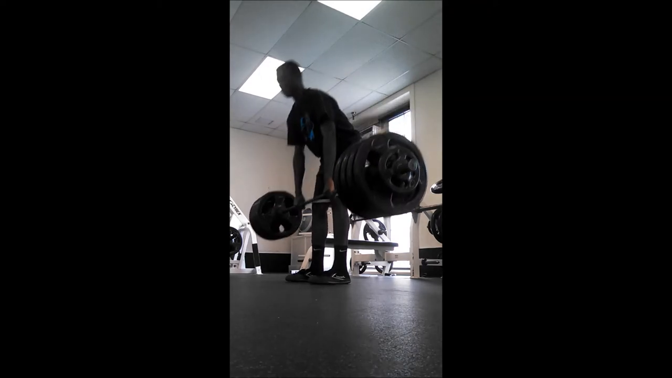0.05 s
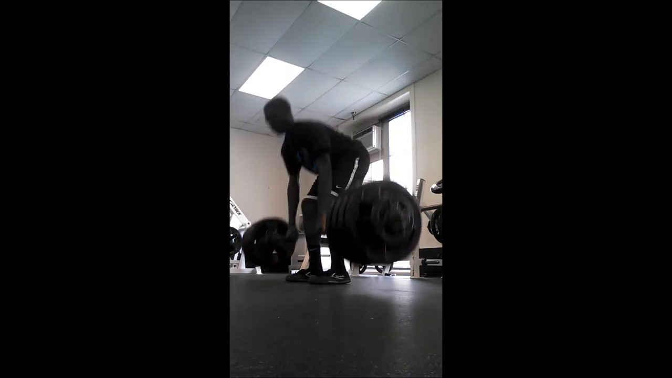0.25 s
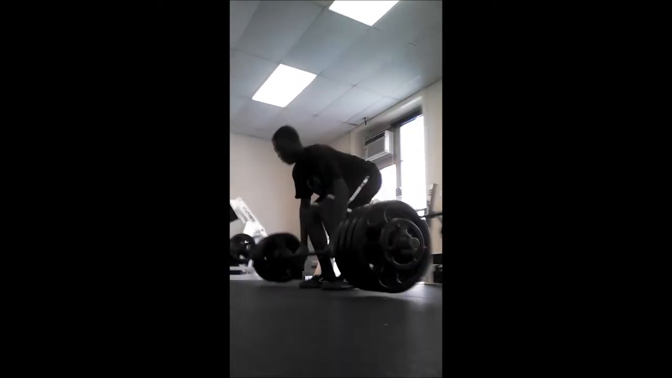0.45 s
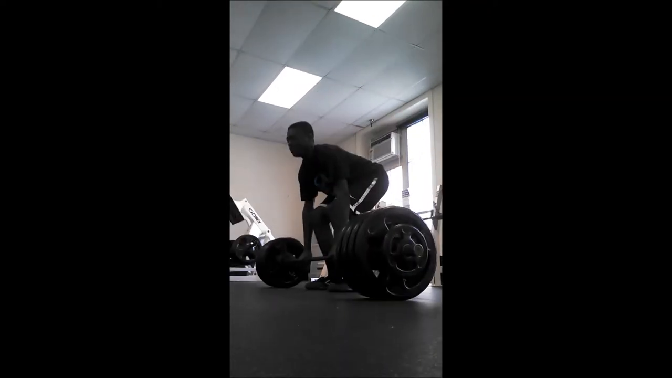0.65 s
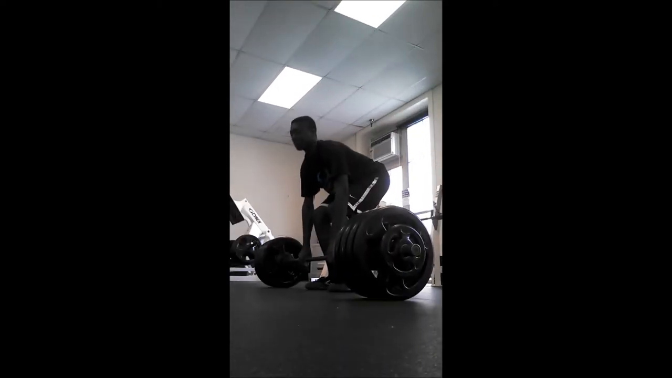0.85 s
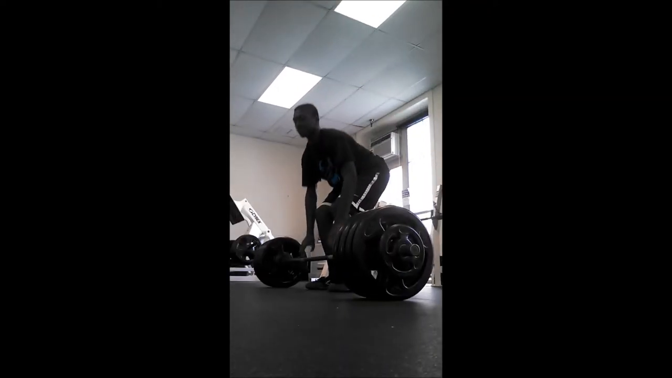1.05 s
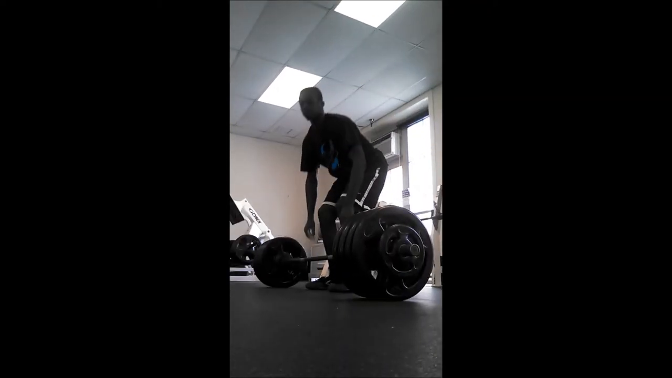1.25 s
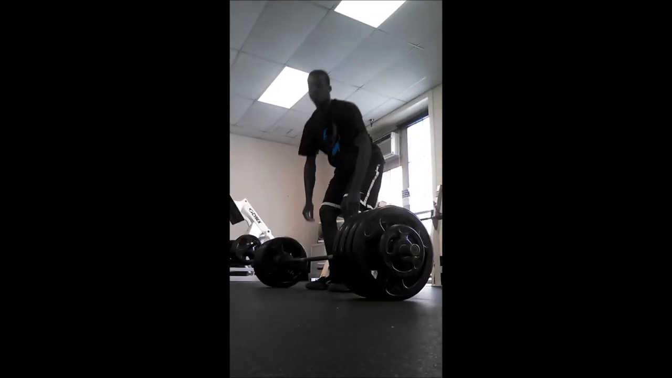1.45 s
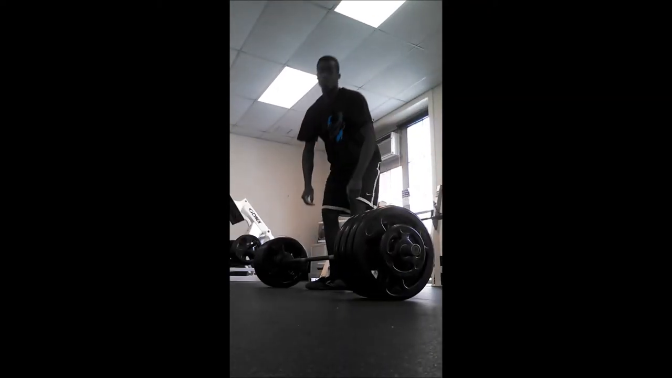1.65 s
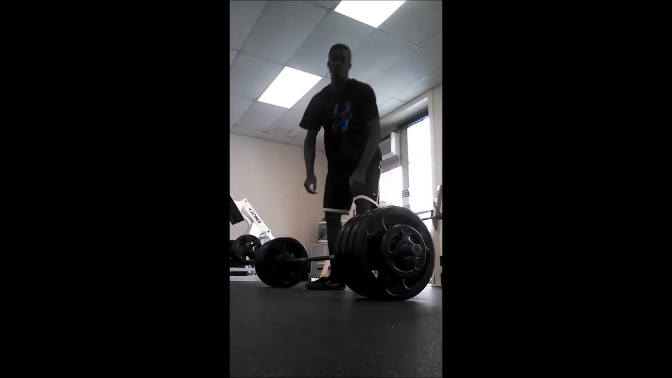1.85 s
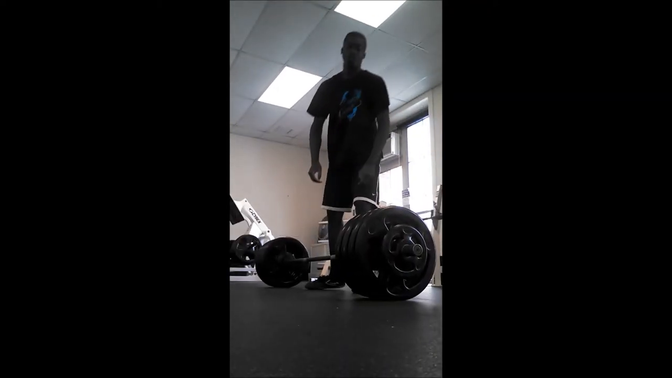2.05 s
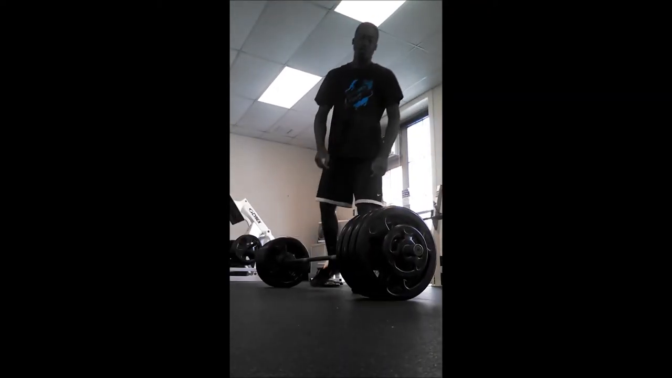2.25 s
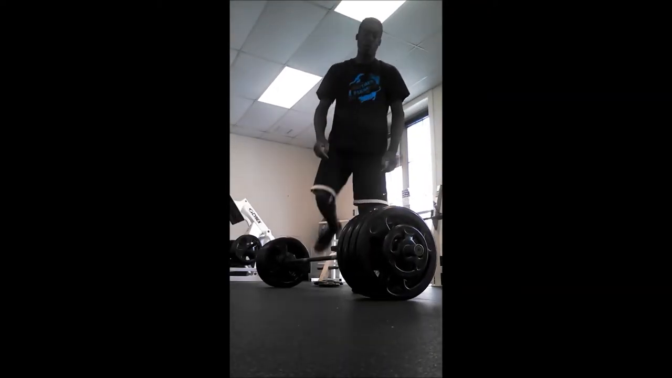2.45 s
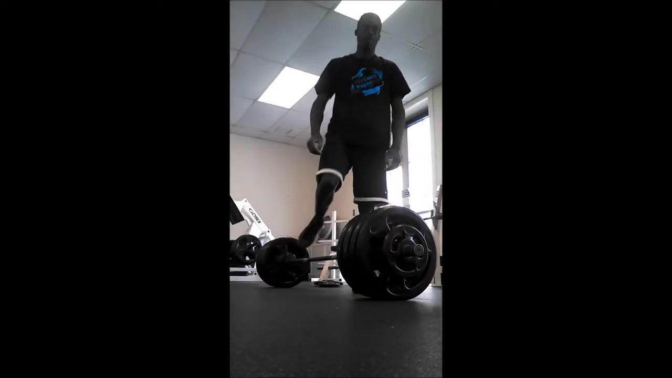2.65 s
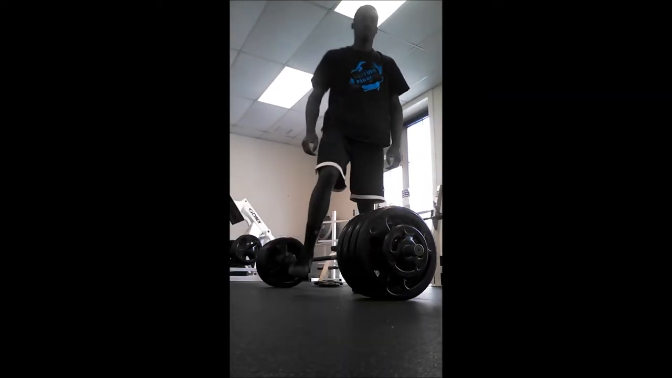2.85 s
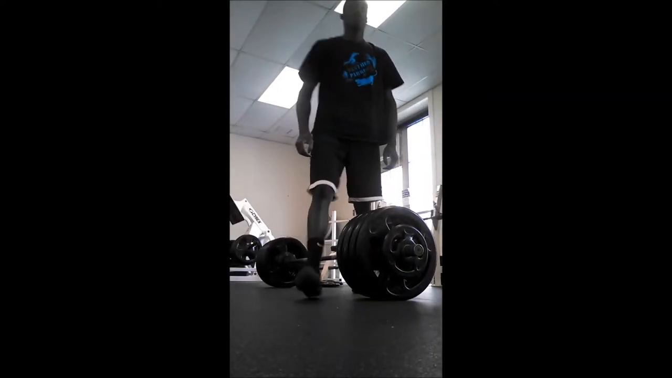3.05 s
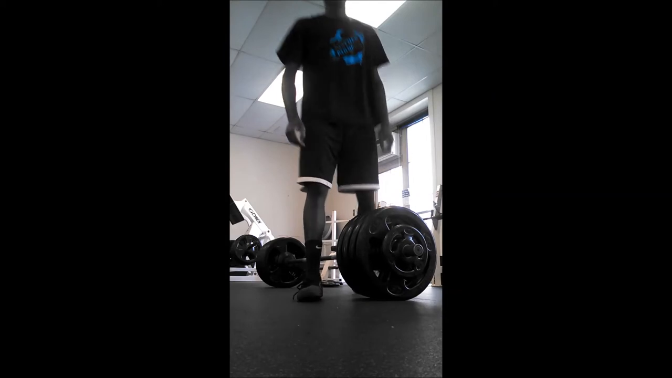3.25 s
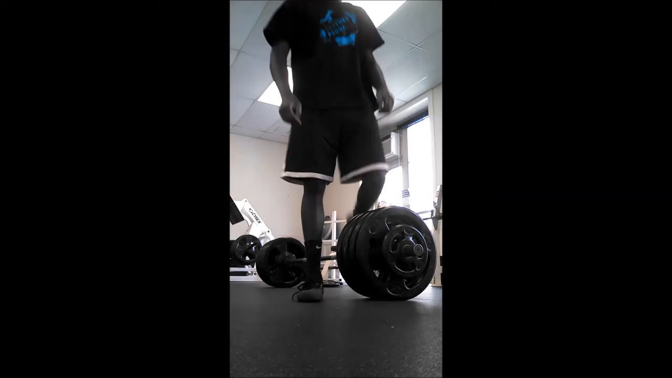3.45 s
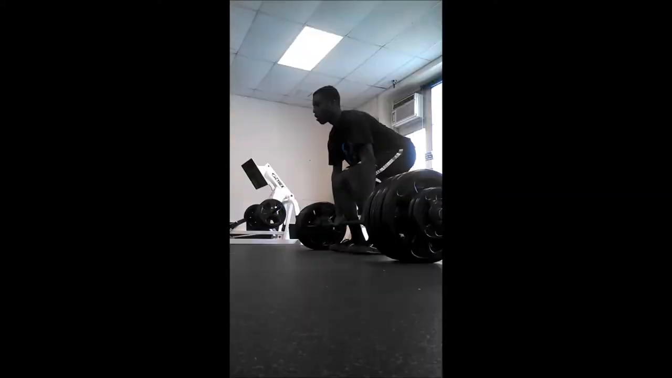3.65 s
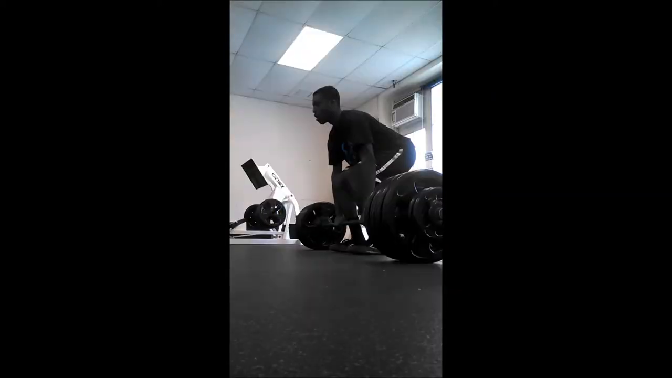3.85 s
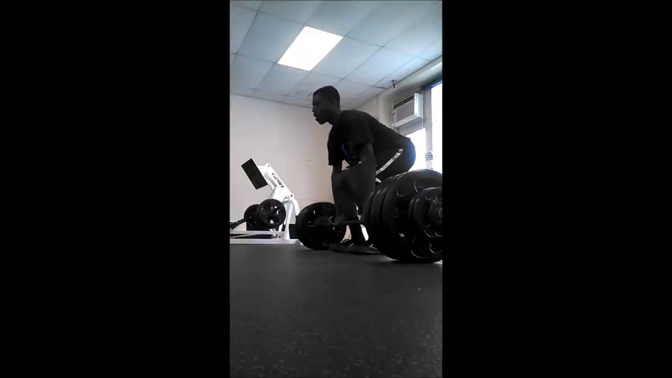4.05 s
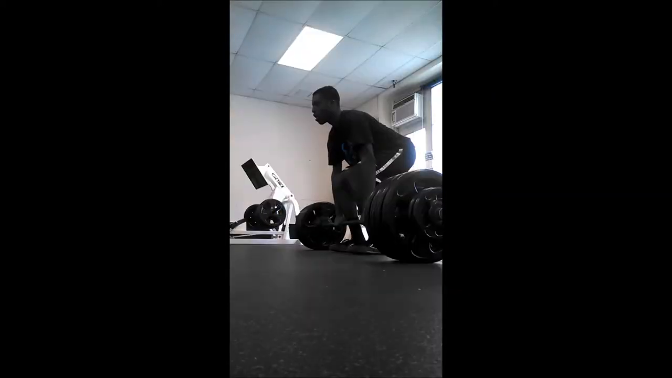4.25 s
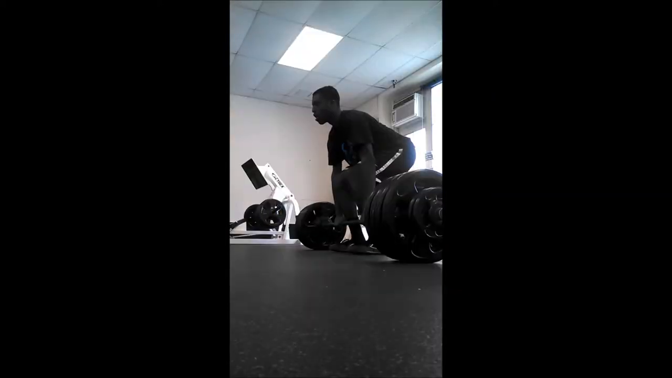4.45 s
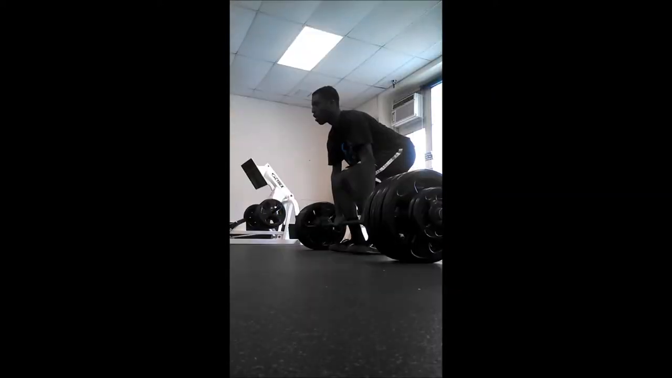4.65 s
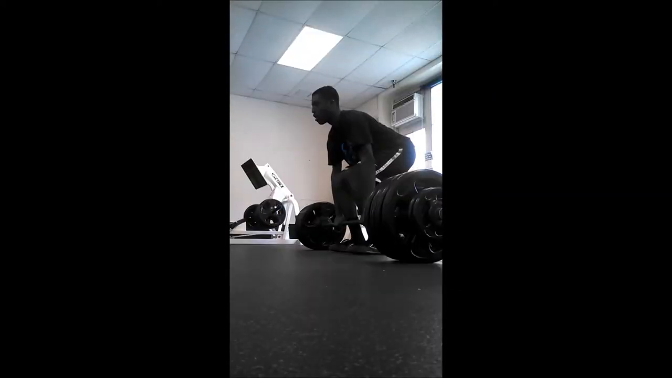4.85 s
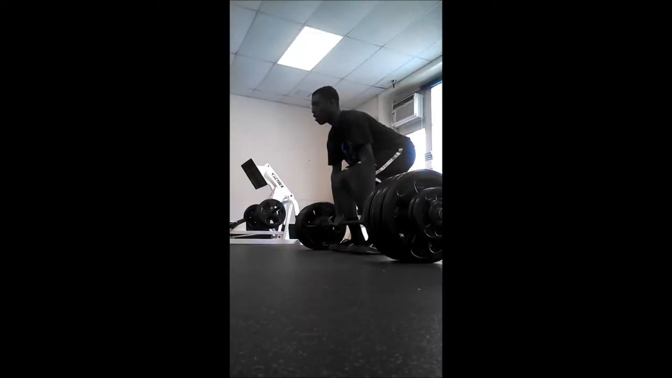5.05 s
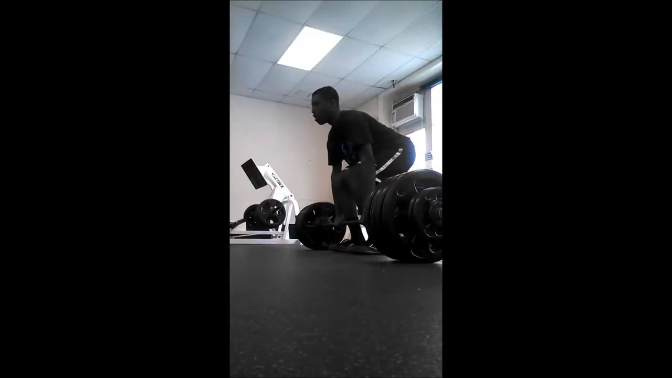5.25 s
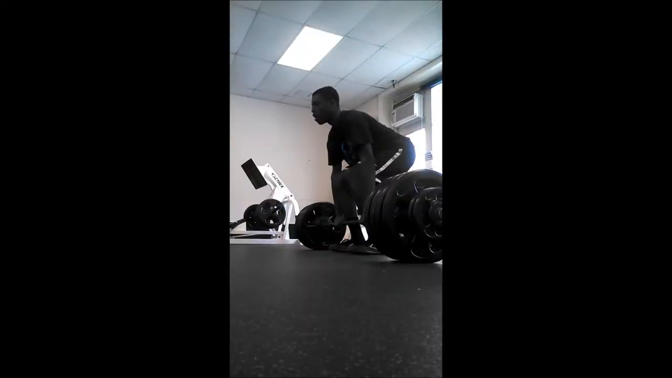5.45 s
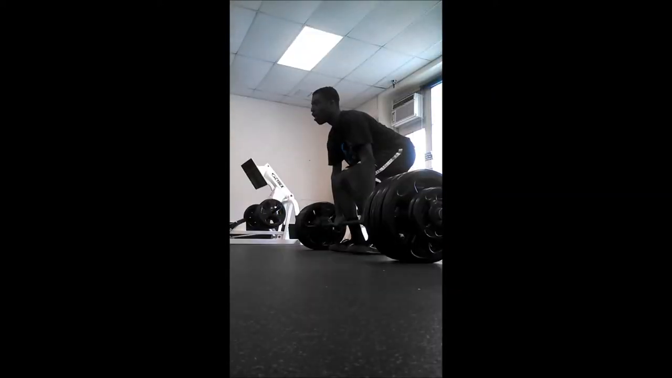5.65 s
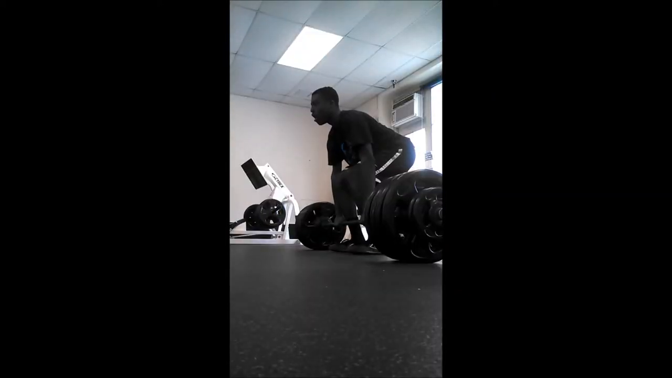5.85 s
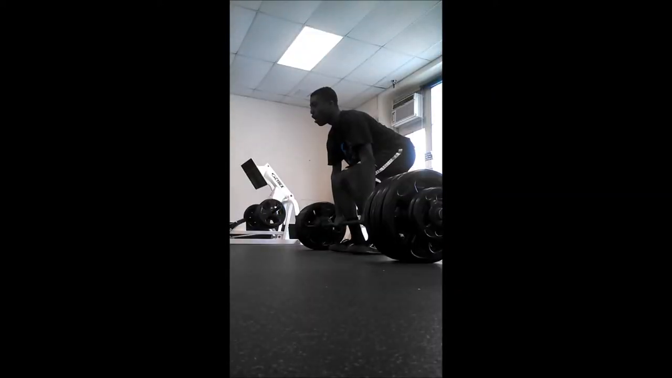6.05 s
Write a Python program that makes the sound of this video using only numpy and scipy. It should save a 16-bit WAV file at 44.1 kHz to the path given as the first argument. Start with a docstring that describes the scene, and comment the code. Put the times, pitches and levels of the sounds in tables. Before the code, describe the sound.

Over a rushing air conditioner, iron plates crash down with deep thuds and bounces, then seconds later a metal bar knocks and chatters.

```python
"""Air rushes and hums from an air conditioner; then a barbell with iron plates lands on a rubber gym floor,
bounces and clanks; later a steel bar rattles in its rack. Air and metal are shaped noise, the metal ringing
through resonances; thuds and booms are short low sines. A phone on the floor feels the thuds; its gain control
ducks after loud sounds and creeps back. Its right channel is largely an inverted, turned, late copy of the left."""
import sys
import numpy as np
from scipy import signal
from scipy.fft import rfft, irfft, next_fast_len
from scipy.io import wavfile
from scipy.ndimage import uniform_filter1d, map_coordinates

SR = 44100
rng = np.random.default_rng(int(sys.argv[2]) if len(sys.argv) > 2 else 0)


def put_to_file(sound):
    """Save the sound as 16-bit audio at rate SR, in the file named by the first command-line argument."""
    columns = np.atleast_2d(sound).T  # one column per channel
    safe = np.clip(columns, -1, 1)
    whole_steps = np.round(safe * 32767)
    wavfile.write(sys.argv[1], SR, whole_steps.astype(np.int16))


N = 269451


def amp(db):
    """dB to gain."""
    return 10 ** (np.asarray(db) / 20)


def unit(x):
    """Scaled to rms 1."""
    return x / np.sqrt(np.mean(np.abs(x) ** 2) + 1e-20)


def along(points, hz):
    """Values at hz between (f/Hz, value) points on a log frequency axis."""
    f, v = np.transpose(points)
    return np.interp(np.log(hz + 1), np.log(f + 1), v)


def wobble(rate):
    """A smooth random curve, rate knots a second."""
    knots = rng.standard_normal(int(N * rate / SR) + 4)
    return map_coordinates(knots, [np.arange(N) * rate / SR])


def filtered(x, response):
    """x times a complex response of frequency."""
    m = next_fast_len(N + SR)
    return irfft(rfft(x, m) * response(np.fft.rfftfreq(m, 1 / SR)), m)[..., :N]


def causal(points, hz):
    """The minimum-phase response of (f/Hz, level/dB) points, mean power 1."""
    cepstrum = irfft(np.log(amp(along(points, hz)) + 1e-6))
    # fold the cepstrum onto positive times
    cepstrum[1:len(cepstrum) // 2] *= 2
    cepstrum[len(cepstrum) // 2 + 1:] = 0
    return unit(np.exp(rfft(cepstrum, 2 * len(hz) - 1)))


def lagging(db, speed):
    """Follows rises at once and falls no faster than speed dB a second."""
    ramp = speed * np.arange(N) / SR
    return np.maximum.accumulate(db + ramp) - ramp


def air():
    """Air rushes through the grille as patchy shaped noise over motor tones wavering in pitch and level."""
    # spectrum of the rush: f/Hz, relative level/dB per Hz
    rush_spectrum = [(32, -30), (58, 3.5), (100, 1), (150, -2), (250, -3.5), (400, -4), (700, -8.5),
                     (1200, -8.5), (1800, -12), (2300, -18), (3000, -24.5), (5000, -27), (8000, -30.5),
                     (11000, -46), (15000, -59)]
    # motor tones: f/Hz, level/dB, dip/dB where the wobble is 1
    hum = [(87, -38, 4), (119, -36, 4), (177.5, -26, 3), (239.5, -29.5, 4), (360.5, -37, 3)]
    z = signal.stft(rng.standard_normal(N), nperseg=512)[2]
    field = uniform_filter1d(rng.standard_normal(z.shape), size=5, axis=0)
    field = uniform_filter1d(field, size=10, axis=1)
    patchy = signal.istft(z * amp(0.6 * unit(field)), nperseg=512)[1][:N]
    swell_db = 1.2 * wobble(2.2)
    shaped = filtered(patchy, lambda hz: amp(along(rush_spectrum, hz)) * (hz > 22))
    out = amp(-23.0 + swell_db) * unit(shaped)
    t = np.arange(N) / SR
    for hz, db, dip_db in hum:
        level = amp(db - dip_db * wobble(7.2) ** 2)
        drift = 2 * np.pi * np.cumsum(1.2 * wobble(12)) / SR
        out += level * np.sin(2 * np.pi * hz * t + drift)
    return out


def gym(x, count=7):
    """The room answers with noise tails, each frequency dying at its own speed.

    Several tails take turns, so no single tail's peaks ring on."""
    # decay of the room: f/Hz, t60/s
    decay = [(150, 0.51), (1000, 0.51), (4000, 0.47), (12000, 0.49)]
    hz, t, z = signal.stft(rng.standard_normal((count, SR)), SR, nperseg=256)
    tails = signal.istft(z * amp(-60 * t / along(decay, hz)[:, None]), SR, nperseg=256)[1]
    # each 1/20 s of sound goes to the next tail in turn, 300 samples late
    turn = np.arange(N) // (SR // 20) % count
    parts = [np.pad(x * (turn == k), (300, 0)) for k in range(count)]
    return signal.fftconvolve(parts, tails / np.linalg.norm(tails[0]), axes=1).sum(axis=0)[:N]


def ports(x):
    """The right microphone channel is inverted, late, phase-turned below 2.7 kHz and partly scattered in time."""
    # phase of the right channel before inversion and lateness: f/Hz, turn/rad
    phase_turn = [(50, -.1), (90, -.5), (170, -1.5), (330, -2), (650, -1.7), (1000, -1), (1400, 0),
                  (2050, 3.3), (2476, 5.5)]
    # scattered part, as a share of amplitude: f/Hz, share
    apart = [(40, .15), (90, .25), (170, .12), (1400, .15), (2100, .75), (2500, .55), (2750, .05),
             (3300, .4), (12000, .4)]
    # right channel over left: f/Hz, level/dB
    louder = [(40, 1.5), (170, 2), (450, .5), (1000, 0), (12000, 0)]
    late = 16  # samples
    smear = rng.standard_normal(SR // 20) * amp(-60 * np.arange(SR // 20) / (SR // 20))

    def right(hz):
        turn = along(phase_turn + [(SR / late, 2 * np.pi)], hz) - 2 * np.pi * hz * late / SR
        scattered = unit(rfft(smear, 2 * len(hz) - 1))
        # where the late copy exactly opposes the left channel nothing is scattered
        opposed = np.where(hz > SR / late, np.abs(np.sin(np.pi * hz * late / SR)), 1)
        share = along(apart, hz) * opposed
        copy = -np.sqrt(1 - share ** 2) * np.exp(1j * turn)
        return amp(along(louder, hz)) * (share * scattered + copy)
    return np.array([x, filtered(x, right)])


def ticks():
    """Dry ticks of dying, band-passed noise, the first a very short click, alike in both channels."""
    # ticks: t/s, level/dB before the band-pass, t60/s
    clicks = [(3.7045, -12, .002), (4.32, -43, .05), (5.727, -38, .04)]
    out, t = np.zeros(N + SR), np.arange(SR // 10) / SR
    for s, db, t60 in clicks:
        out[round(s * SR):][:len(t)] += amp(db - 60 * t / t60) * rng.standard_normal(len(t))
    return signal.lfilter(*signal.butter(1, [877, 5900], "bandpass", fs=SR), out[:N])


def struck(hits, modes, crash, ring_db, scatter_db, detune, lumps_db):
    """Each hit is a lumpy, dying chatter of contacts; it lands elsewhere, so the modes ring at new strengths."""
    rise_share = 0.08  # time constant of a hit's swell, as a share of its chatter t60
    contacts_per_s = 230  # lumps of the chatter
    skirt = 1.5  # each mode is a doubled resonance; its halves are this much wider than the peak
    out, t = np.zeros(N + SR), np.arange(SR // 3) / SR
    f = np.fft.rfftfreq(2 ** 15, 1 / SR)
    centre, level, width = np.transpose(modes)[:, :, None]
    noisy = causal(crash, f)

    def ring(c, db):
        damping = 1j * f * width * skirt
        return (amp(db) * (damping / (c * c - f * f + damping)) ** 2).sum(axis=0)

    scale = amp(ring_db) / np.sqrt(np.mean(np.abs(ring(centre, level)) ** 2))
    for s, db, t60 in hits:
        chance = rng.standard_normal((2, len(modes), 1))
        knots = rng.standard_normal(len(t))
        lumps = unit(amp(lumps_db * np.interp(t * contacts_per_s, np.arange(len(t)), knots)))
        envelope = amp(db - 60 * t / t60) * (1 - np.exp(-t / (rise_share * t60)))
        # one force rings the modes, the other makes the unpitched crash
        force = envelope * lumps * rng.standard_normal((2, len(t)))
        body = scale * ring(centre * (1 + detune * chance[0]), level + scatter_db * chance[1])
        out[round(s * SR):][:2 ** 15] += irfft((rfft(force, 2 ** 15) * [body, noisy]).sum(axis=0))
    return out[:N]


def rack_bar():
    """The steel bar knocks and chatters in its rack, exciting its narrow modes and an unpitched crash."""
    # knocks: t/s, level/dB before the mix, chatter t60/s
    knocks = [(4.5347, 22, 0.0015), (4.538, 12, 0.055), (4.568, 6, .05), (4.629, 19, 0.04),
              (4.64, 16, 0.091), (4.657, 10.5, 0.084), (4.68, 25.5, 0.028), (4.697, 14, 0.023),
              (4.72, 0, 0.098), (4.745, 13.5, 0.034), (4.775, 3, 0.25), (4.8, 3, 0.043), (4.825, 5, 0.044),
              (4.86, 4.5, 0.099), (4.885, 13, 0.031), (4.898, 13.5, 0.057), (4.935, 1, 0.04),
              (4.977, 5, 0.075), (5.038, 3.5, 0.055), (5.085, -2, 0.02), (5.125, -13, 0.054)]
    # bar modes: f/Hz, relative level/dB, width/Hz
    modes = [(1206, 3, 30), (1238, -6, 20), (1370, -10, 40), (1550, -6, 60), (1624, 1, 34), (1906, 1, 26),
             (2225, -7, 36), (2545, -7, 28), (2885, 0, 28), (2980, -6, 40), (3264, -4, 30), (3400, -4, 45),
             (3600, -4, 40), (4052, 0, 26), (4470, -3, 36), (4910, -10, 34), (5355, -3, 26), (5814, -1, 26),
             (6295, -3, 30), (6788, -4, 30), (7293, -2, 34), (7795, -6, 24), (8312, -13, 40),
             (8549, -11, 40), (8850, -15, 40), (9410, -16, 40), (9948, -18, 40), (10874, -11, 40),
             (11240, -23, 40)]
    # unpitched part of a knock: f/Hz, relative level/dB per Hz
    crash = [(400, -31), (800, -21.5), (1200, -5), (2000, 0), (3000, 1.5), (4500, -8), (7000, -3.5),
             (9500, -16.5), (12000, -15.5), (12900, -24), (13500, -71), (15000, -75.5)]
    return struck(knocks, modes, crash, ring_db=5, scatter_db=3, detune=.002, lumps_db=4)


def plates():
    """Iron plates strike each other, exciting their modes and an unpitched crash."""
    # clanks: t/s, level/dB before the mix, chatter t60/s
    clanks = [(.3885, 12.5, 0.028), (.397, 12, 0.091), (.405, 16, 0.036), (.43, 5.5, 0.075),
              (.445, -0.5, 0.11), (.462, 2.5, 0.074), (.505, -5.5, 0.14), (.603, -4, 0.05), (.61, -3, .09),
              (.64, -22, .06), (.725, -6.5, 0.046), (.76, -8, 0.031), (.777, -8.5, 0.075), (.8165, 0, 0.05),
              (.822, -2.5, 0.096), (.85, -15, 0.11), (.905, -12, 0.086)]
    # plate modes: f/Hz, relative level/dB, width/Hz
    modes = [(1040, -7, 40), (1110, -7, 30), (1350, 3, 38), (1595, 3, 22), (1790, -3, 35), (1915, -3, 40),
             (2620, -6, 45), (2915, -2, 35), (3030, -1, 50), (3086, 3, 28), (3320, -6, 40), (4500, -12, 30),
             (5400, -9.5, 29), (5850, -11, 50), (6780, -8, 70), (7400, -5, 25), (8050, -9, 49)]
    # unpitched part of a clank: f/Hz, relative level/dB per Hz
    crash = [(400, -4), (800, -6), (1400, -1), (2200, -5.5), (3100, 0.5), (4500, -8), (7000, -3),
             (9500, -11), (12000, -25), (15000, -40.5)]
    return struck(clanks, modes, crash, ring_db=-4, scatter_db=3.5, detune=.007, lumps_db=4)


def booms():
    """The floor's lowest resonance booms through the air, sagging in pitch, alike in both channels."""
    # low booms under two of the landings: t/s, level/dB
    landings = [(0.4150, 21), (4.655, -3)]
    start_hz, sag_hz_per_s, t60_s, rise_s = 170, 900, 0.05, .001
    out, t = np.zeros(N + SR), np.arange(SR // 2) / SR
    pitch = np.maximum(start_hz - sag_hz_per_s * t, start_hz / 2)
    wave = -np.sin(2 * np.pi * np.cumsum(pitch) / SR)
    for s, db in landings:
        envelope = amp(db - 60 * t / t60_s) * (1 - np.exp(-t / rise_s))
        out[round(s * SR):][:len(t)] += envelope * wave
    return out[:N]


def thuds():
    """Each blow is a low push of a cycle or two, a dull slap and a rebound off the mat; the floor shudders."""
    # blows felt through the floor: t/s, level/dB, f/Hz, phase lead of the left channel over the right/rad
    blows = [(0.3828, 6.5, 195, 1.6), (0.4139, 12.5, 253, 2.1), (0.4197, 12, 200, 1.9), (.431, 8, 176, 1.8),
             (0.445, 11, 221, 0.88), (0.455, 13, 165, 3.3), (.478, 6, 199.4, 1.3),
             (0.4913, 15.5, 215, 2.56), (.502, 14.5, 306, 2.4), (0.533, 12, 159, 2.85),
             (.602, 5, 196, 2.85), (.641, 3, 190, 3.8), (.671, -2.5, 181, 3.3), (0.695, -10.5, 220, 2.05),
             (4.6546, 8.5, 227, 2.44), (4.77, -15, 152, 1.5), (4.788, -19, 150, 2.3),
             (4.842, -20, 135, 1.1), (4.901, -12.5, 130, 2.3)]
    rebound_s, rebound_db, rebound_pitch = 0.0087, -7, 0.65  # delay, level and pitch ratio to the blow
    shake_db, shake_t60 = -14, 0.18  # levels relative to the blow, t60 in s
    slap_db, slap_t60 = -8, 0.073
    out, slaps, t = np.zeros((2, N + SR)), np.zeros(N + SR), np.arange(SR // 4) / SR
    mat = signal.butter(2, [70, 400], "bandpass", fs=SR)
    rebounds = [(s + rebound_s, db + rebound_db, hz * rebound_pitch, turn) for s, db, hz, turn in blows]
    for s, db, hz, turn in blows + rebounds:
        u = 2.2 * t * hz
        phase = 2 * np.pi * hz * t + np.array([[.5], [-.5]]) * turn
        push = -np.sin(phase) * np.e * u * np.exp(-u)
        shudder = unit(signal.lfilter(*mat, rng.standard_normal((2, len(t)))))
        shudder = shudder * amp(shake_db - 60 * t / shake_t60)
        out[:, round(s * SR):][:, :len(t)] += amp(db) * (push + shudder)
    for s, db, *_ in blows:
        slap = amp(db + slap_db - 60 * t / slap_t60) * rng.standard_normal(len(t))
        slaps[round(s * SR):][:len(t)] += slap
    slaps = signal.lfilter(*signal.butter(2, [280, 1900], "bandpass", fs=SR), slaps[:N])
    felt = signal.lfilter(*signal.butter(2, 65, "highpass", fs=SR), out[:, :N])
    return felt + ports(slaps)


def scene():
    """Iron, steel and their room, part of which reaches both channels alike; the air unit, thuds and booms."""
    metal = amp(2.0) * plates() + amp(-10.0) * rack_bar()
    heard = ports(metal + amp(-0.5) * gym(metal) + air())
    return heard + amp(-11) * gym(metal) + ticks() + thuds() + booms()


def record(dry):
    """The phone's slow gain control or fast compressor, whichever cuts more, then clipping and a band limit."""
    aim_db, depth_db, rise, fall = -21, 22, 9.3, 35  # slow control; speeds in dB a second
    ceiling_db, release, grip = -13, 70, 0.89  # compressor; dB a second, share of the excess removed
    top_hz = 15725
    power = np.mean(dry ** 2, axis=0)

    def level(s):
        """Level in dB over the last s seconds."""
        size = round(s * SR)
        return 10 * np.log10(np.abs(uniform_filter1d(power, size, origin=size // 2 - 1)) + 1e-9)

    # the cut follows the loudest recent level, forgotten at rise dB a second, and sets in at fall dB a second
    cut = np.minimum(lagging(np.maximum(0, level(.05) - aim_db), rise), depth_db)
    slow = lagging(-cut, fall)
    excess = lagging(np.maximum(0, level(.007) - ceiling_db), release)
    fast = -grip * uniform_filter1d(excess, size=200)
    x = dry * amp(np.minimum(slow, fast))
    x = x / (1 + np.abs(x) ** 8) ** (1 / 8)  # soft clipping at 1
    return filtered(x, lambda hz: hz < top_hz)


dry = scene()
out = record(dry)
put_to_file(out)
```